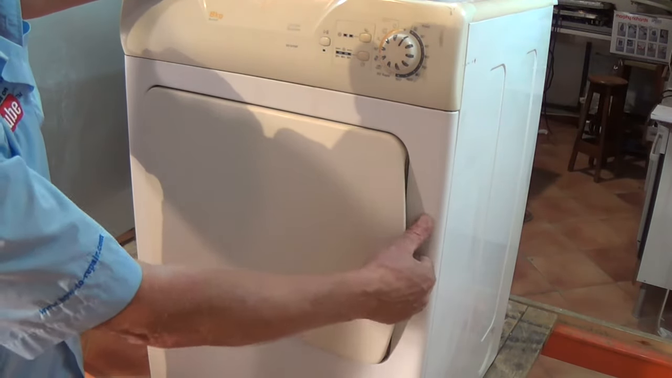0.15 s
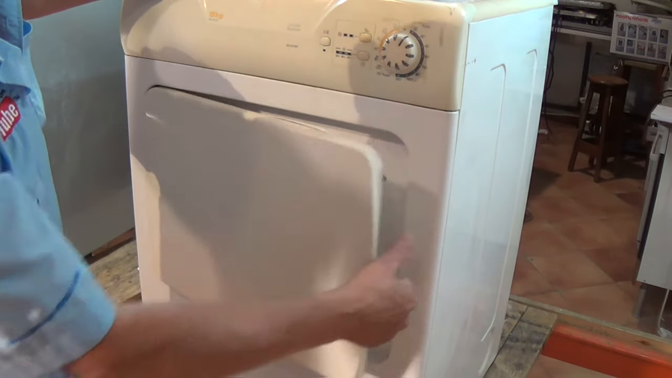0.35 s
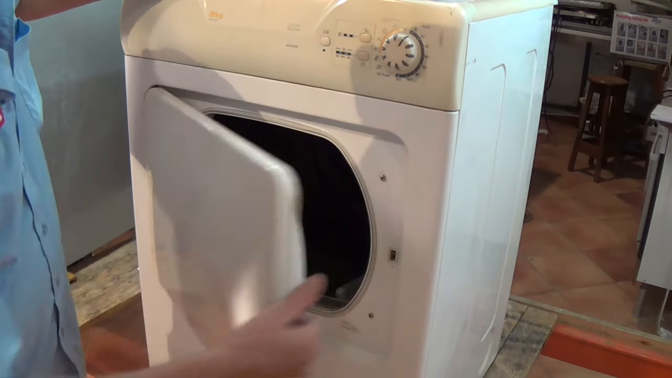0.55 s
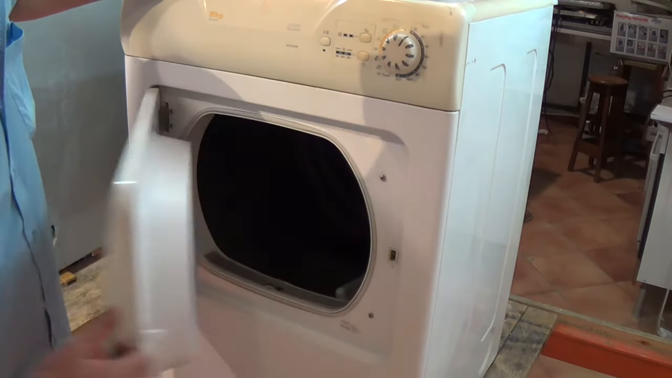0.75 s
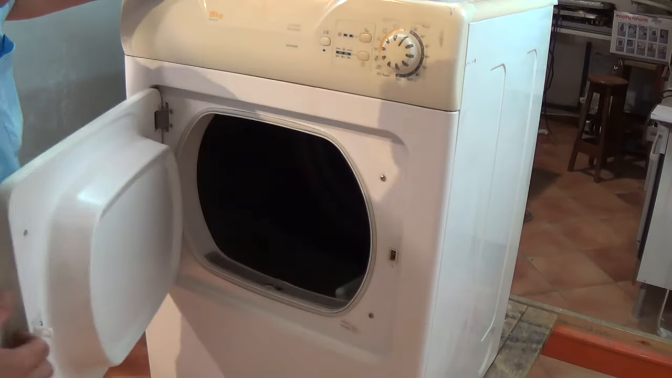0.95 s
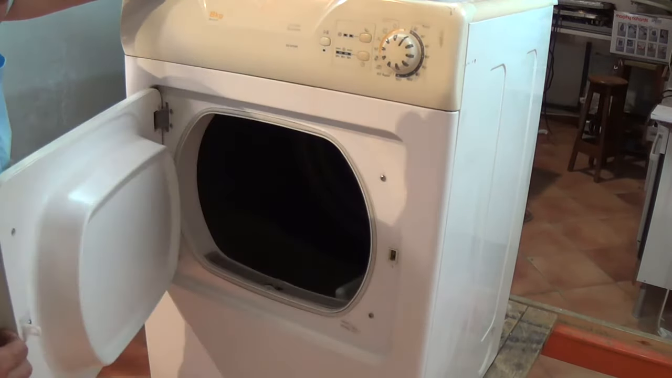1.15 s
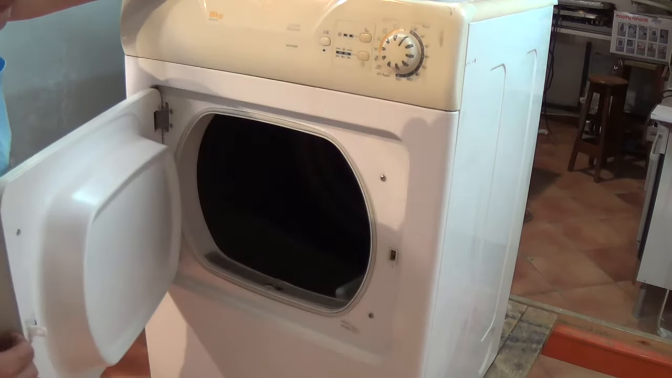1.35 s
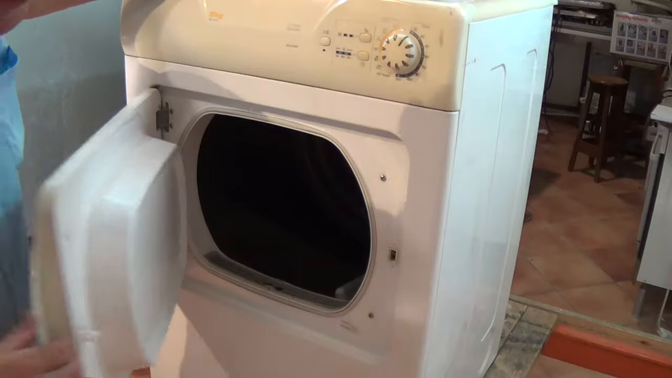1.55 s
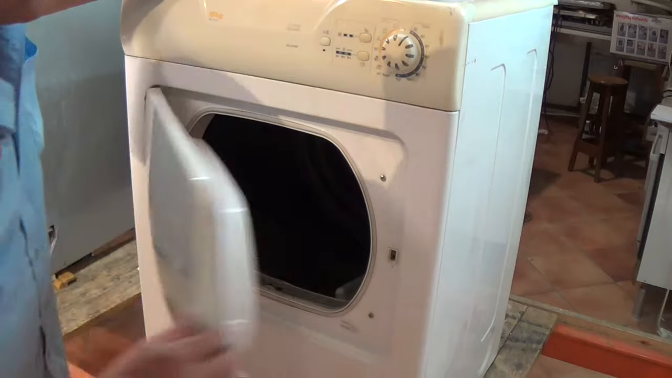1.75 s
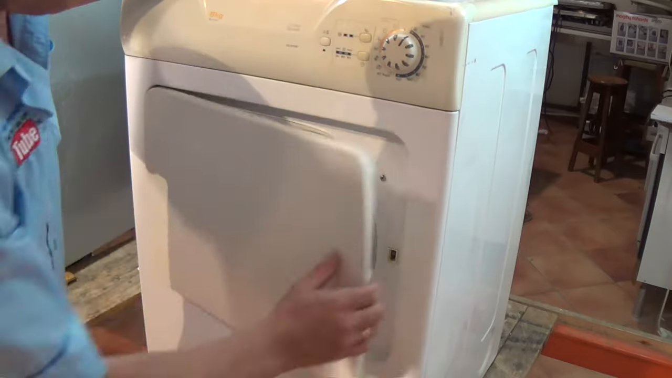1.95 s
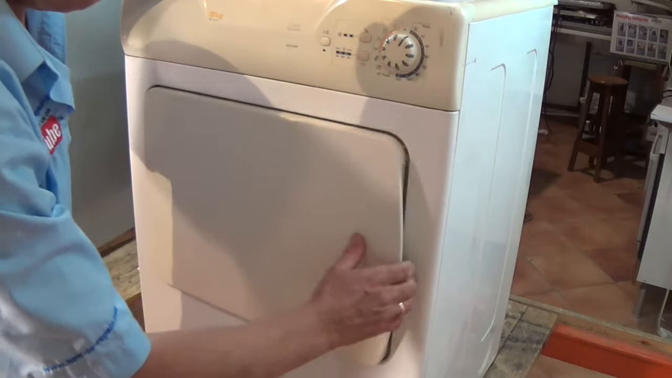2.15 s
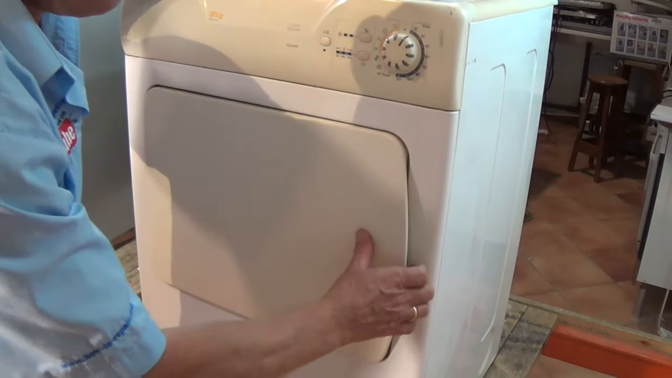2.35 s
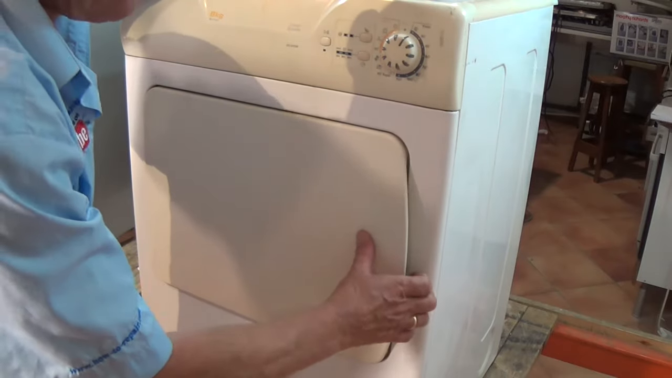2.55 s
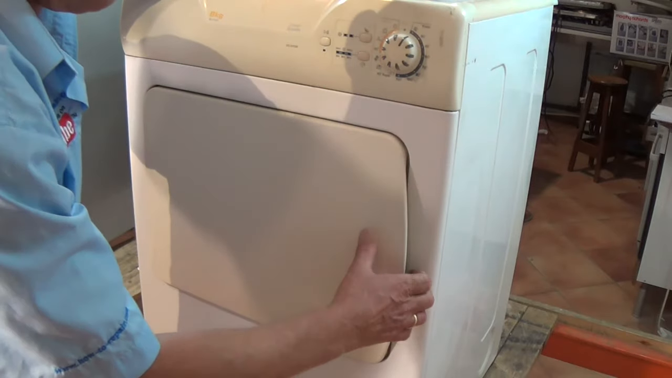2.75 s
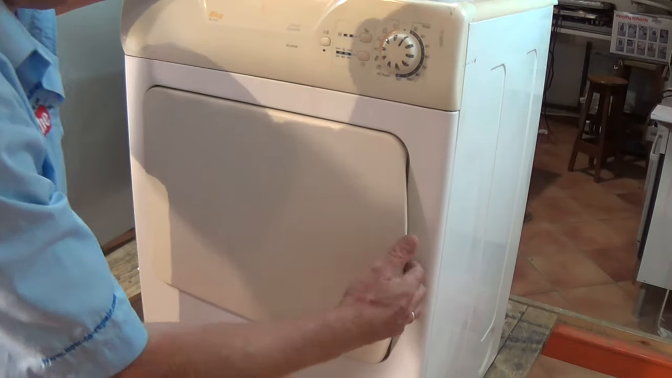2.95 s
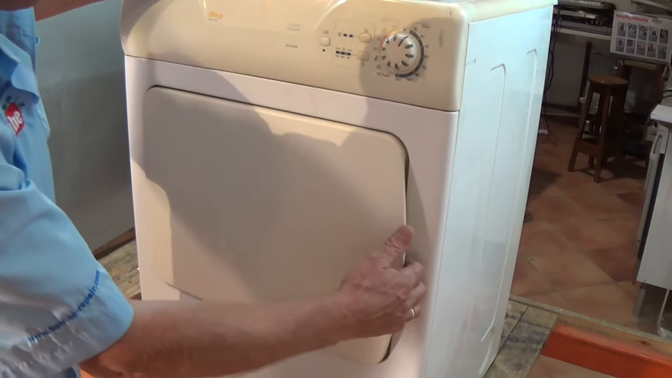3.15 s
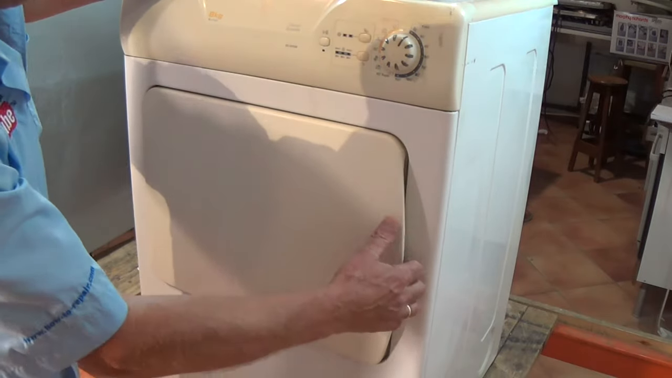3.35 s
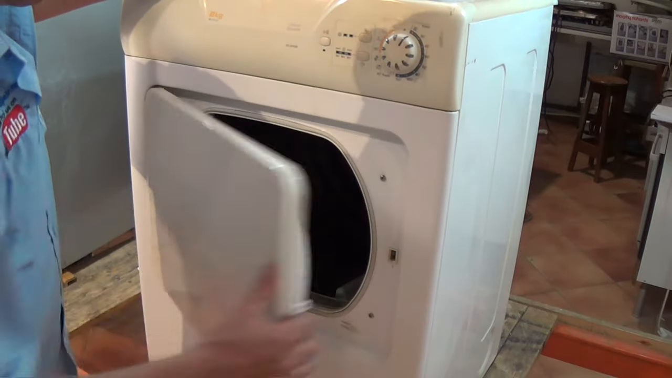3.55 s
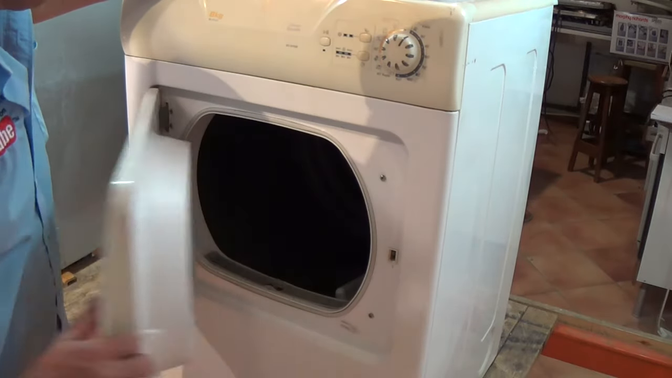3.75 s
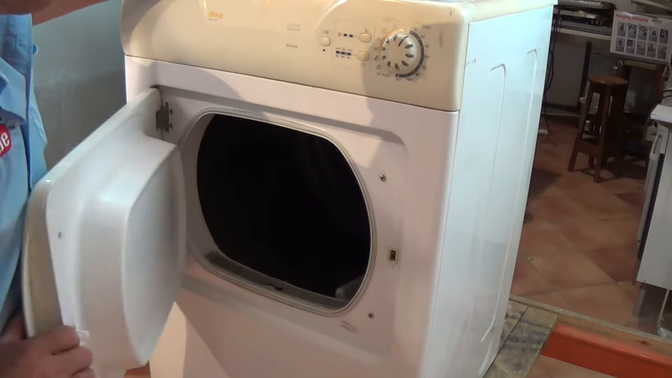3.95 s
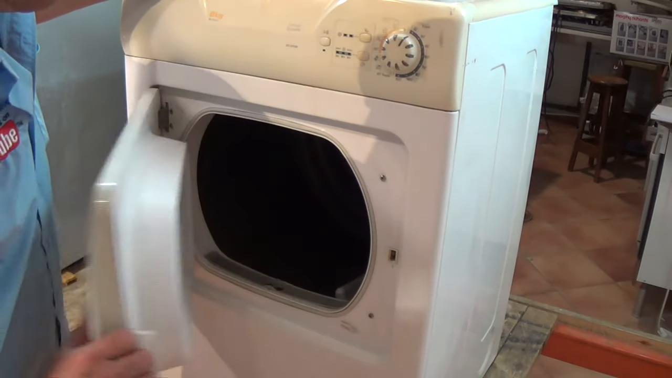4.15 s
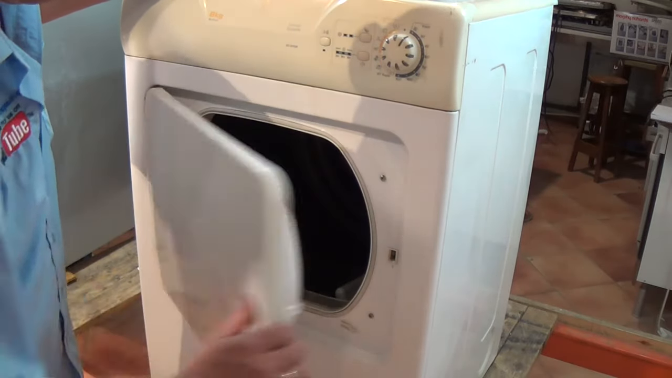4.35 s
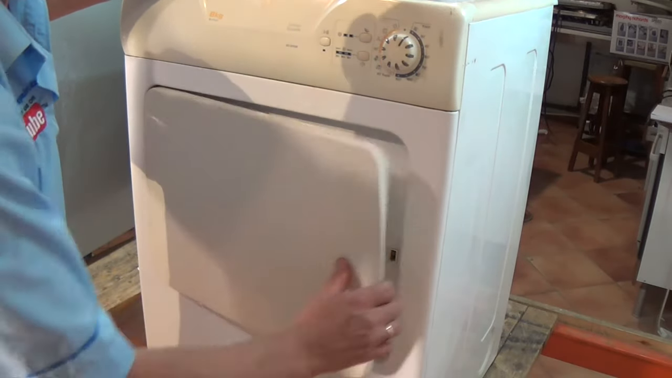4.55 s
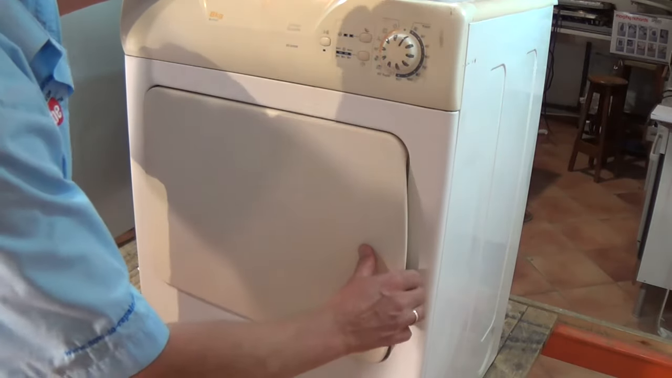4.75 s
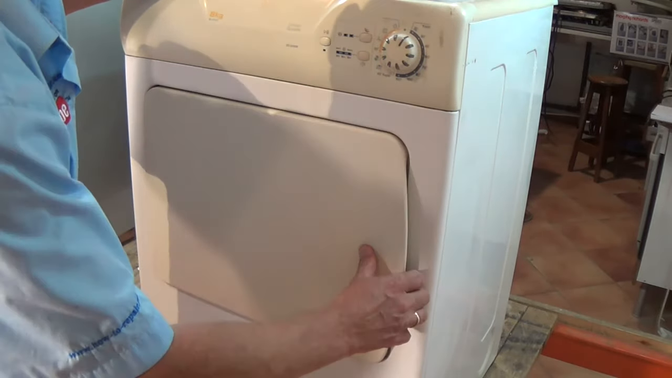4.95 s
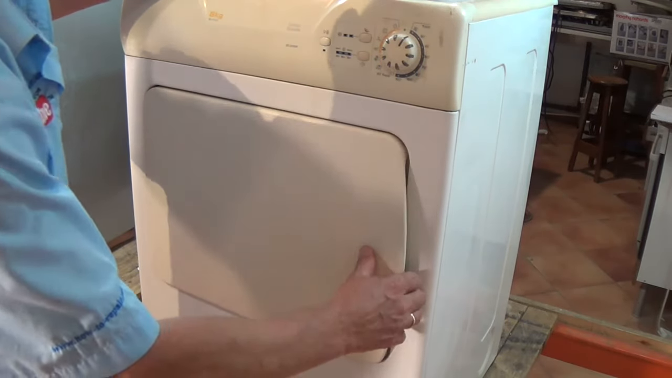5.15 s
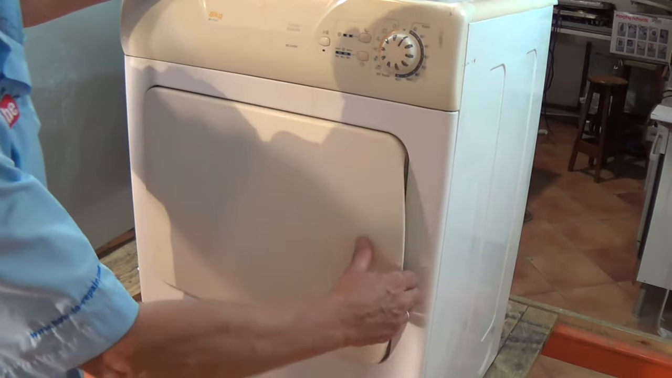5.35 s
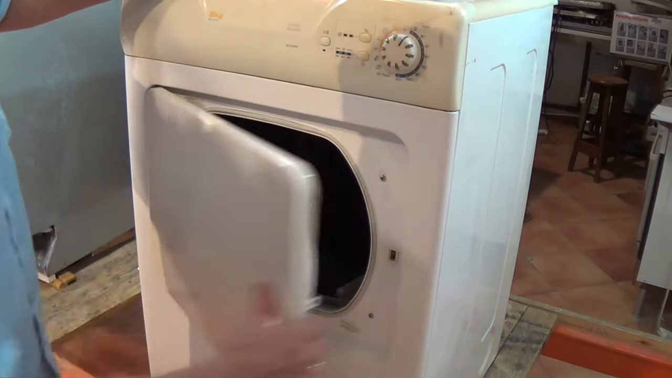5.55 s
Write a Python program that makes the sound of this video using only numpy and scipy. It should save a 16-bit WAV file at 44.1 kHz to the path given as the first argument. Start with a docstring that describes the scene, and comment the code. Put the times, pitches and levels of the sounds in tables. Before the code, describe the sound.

Loud latch snaps and hollow sheet-metal booms as a dryer door opens, creaks wide, shuts, reopens, shuts, and pops open once more.

```python
"""A tumble dryer's plastic door is pulled open, swung wide and pushed shut, twice over, then pulled open once more.
At each pull or shut, the latch's noise burst snaps and the decaying modes of the sheet-steel cabinet ring on.
Wide open, the hinge groans: uneven stick-slip pulses drive the door's resonances; after each shut it rebounds.
Throughout, banded noise makes a sleeve rustle and still air; sine waves make a faint hum and a far cricket."""
import sys
import numpy as np
from scipy import signal
from scipy.fft import rfft, irfft, next_fast_len
from scipy.io import wavfile
from scipy.ndimage import map_coordinates

SR = 44100
rng = np.random.default_rng(int(sys.argv[2]) if len(sys.argv) > 2 else 0)


def int16_out(signal):
    """Quantize to a 16-bit WAV file."""
    q = np.round(np.clip(np.atleast_2d(signal).T, -1, 1) * 32767)
    wavfile.write(sys.argv[1], SR, q.astype(np.int16))


N = 247401  # samples in the scene

# The latch snaps home. Each row: time in seconds, snap level in dB, cabinet level in dB.
LATCH_SHUTS = [(2.4700, -19, -14.5), (4.8690, -15.5, -16.5)]
# The latch lets go under a pull. Each row: time in seconds, snap level in dB, cabinet level in dB.
LATCH_PULLS = [(0.3636, -18, -20), (3.5257, -15.5, -20), (5.5295, -18.5, -19.5)]
# The hook meets and rides over its catch. Each row: time in seconds, snap level in dB, cabinet level in dB.
HOOK_TOUCHES = [(0.2875, -45.5, -48), (2.300, -39, -43.5), (2.310, -40.5, -41.5), (2.4602, -30.5, -29.5),
                (2.815, -51, -51), (3.509, -45, -38), (4.8078, -36.5, -36.5), (4.8452, -27.5, -35.5),
                (5.2604, -32.5, -40.5), (5.5115, -36, -35)]
# Sharp clicks of hinge and plastic trim. Each row: time in seconds, level in dB.
TRIM_CLICKS = [(0.178, -50), (0.2038, -44.5), (0.3257, -40.5), (0.339, -43), (0.3505, -41), (1.237, -46.5),
               (1.8163, -54), (1.932, -50.5), (3.877, -46), (4.0395, -47.5), (5.140, -48.5)]
# Knocks of hand, hook and hinge. Each row: time in seconds, door level in dB, hook ring level in dB.
DOOR_KNOCKS = [(0.043, -48, -53), (0.695, -49, -64), (0.811, -35, -56), (0.850, -36, -65),
               (0.879, -27.5, -42.5), (1.600, -48, -47), (1.695, -48, -53), (3.1423, -33, -40),
               (3.822, -30, -65), (4.160, -43, -60), (4.8073, -44, -36.5), (4.8452, -34, -46)]
# The hinge binds as the door swings wide. Each row: start in seconds, attack in seconds, hold in seconds,
# slip level in dB, panel tone level in dB.
HINGE_GROANS = [(0.80, 0.095, 0.035, -17.5, -17.5), (1.027, 0.052, 0.049, -45, -30),
                (3.809, 0.03, 0.0088, -31.5, -30), (3.851, 0.033, 0.055, -28, -28.5)]
# The hinge hits its stop. Each row: time in seconds, level in dB.
HINGE_STOPS = [(1.0588, -25)]
# Strokes of the arm. Each row: time of greatest speed in seconds, half length in seconds, rustle level in dB.
ARM_STROKES = [(0.25, 0.38, -58), (1.576, 0.047, -46.5), (1.712, 0.037, -50.5), (1.839, 0.04, -46.5),
               (3.78, 0.2, -52), (4.347, 0.095, -50), (5.424, 0.08, -54)]
# Thin, very high ticks. Each entry: time in seconds.
TICK_TIMES = [0.680, 0.998, 1.3289, 1.670, 2.787, 2.826, 3.0335, 3.049, 3.845, 4.990, 5.3996]

# Ringing steel panels. Each row: frequency in Hz, mean level in dB, 60 dB decay time in seconds.
PANEL_MODES = [(166.4, -20, 0.62), (241.6, -0.5, 0.51), (279.8, -2.5, 0.54), (361.7, -6.5, 0.68),
               (431, -5, 0.27), (486, -8, 0.27), (556, -7.5, 0.17), (590, -11, 0.35), (660, -15, 0.32),
               (694, -4, 0.42), (720, -30, 0.56), (862, -3, 0.36), (918, -10, 0.55), (990, -5, 0.33),
               (1073, -8, 0.22), (1210, -20, 0.36), (1280, -16, 0.21), (1320, -6.5, 0.29),
               (1523, -14, 0.48), (1540, -9, 0.48), (1606, -5, 0.12), (1683, -12.5, 0.25),
               (1810, -7.5, 0.3), (2050, -18, 0.38), (2103, -23, 0.56), (2500, -21.5, 0.53),
               (2530, -26, 0.27)]
# The plastic door's resonances. Each row: frequency in Hz, bandwidth in Hz, level in dB.
DOOR_MODES = [(188, 16, -12), (273, 19, 2), (376, 43, 0.5), (502, 88, -5), (560.5, 14.6, 1.5),
              (653, 17, -2.5), (742, 24, -1), (870, 55, -5.5), (937, 37, -7.5), (1026.6, 16, -7),
              (1152, 49, -35), (1234, 24, -16), (1550, 63, -18)]
# The latch hook's resonances. Each row: frequency in Hz, bandwidth in Hz, level in dB.
HOOK_MODES = [(1190, 100, -1), (1640, 89, -1.5), (2100, 280, -6), (2504, 85, 0.5), (3800, 900, -19)]
# Motor hum and a thin electronic whine. Each row: frequency in Hz, relative level in dB.
HUM_TONES = [(96.9, -61), (145.5, -64.5), (193.8, -63), (242.2, -58), (15622, -70)]

# Spectra of cabinet when shut, cabinet when pulled, latch snap, trim click, hinge stop, machine shudder,
# hinge rasp, cloth and still air. Each row: frequency in Hz, relative spectral level in dB.
SHUT_SPECTRUM = [(65, -33), (110, -9.5), (238, 1), (376, -4), (435, -4), (688, -3.5), (1020, -6.5),
                 (1110, -6), (2210, -16), (4130, -23), (5530, -29), (10500, -33), (13800, -39),
                 (15000, -68), (16000, -91)]
PULL_SPECTRUM = [(65, -33), (110, -15), (174, -17), (248, 0.5), (332, -3.5), (426, -4), (525, -9.5),
                 (1210, -6.5), (1720, -16), (1870, -13.5), (4780, -23), (6950, -31), (10500, -27),
                 (14700, -38.5), (16000, -48)]
SNAP_SPECTRUM = [(300, -7), (900, 8), (2400, 4), (4000, -3), (6500, -16), (9000, -2), (11300, -3.5),
                 (13000, -14.5), (16000, -30)]
CLICK_SPECTRUM = [(300, -30), (1000, -4), (1800, 9), (2400, 3), (3600, -5), (4600, -4), (7000, -9),
                  (9000, 1.5), (11500, -3.5), (13500, -8), (16000, -27)]
STOP_SPECTRUM = [(500, -30), (1000, -4), (1650, -6), (2300, 0), (3700, -1.5), (5600, -9), (7000, -7),
                 (9000, -2.5), (11500, -0.5), (13900, -9), (16000, -28)]
SHUDDER_SPECTRUM = [(20, -22), (32, -29), (42, -4.5), (62, -6), (85, -12.5), (130, -13.5), (220, -6),
                    (500, -67)]
RASP_SPECTRUM = [(200, -14.5), (420, -3), (560, -11), (780, 7.5), (1200, -9), (1700, -10), (2300, -20),
                 (3000, -20.5), (3500, -26.5), (5000, -34), (8000, -35.5), (16000, -40)]
CLOTH_SPECTRUM = [(150, -18), (420, -1.5), (900, -5), (1800, -6.5), (3000, -15), (6500, -23.5),
                  (10500, -16.5), (16000, -37)]
AIR_SPECTRUM = [(15, -39), (25, -7), (53, -8.5), (71, -10), (101, -6.5), (167, -16), (181, -8.5),
                (243, -10.5), (271, -8), (515, -14.5), (1030, -21), (1210, -22.5), (1910, -25), (4260, -28),
                (15000, -33.5)]

# Decay of the cabinet and of the room. Each row: frequency in Hz, 60 dB decay time in seconds.
CABINET_DECAY = [(50, 1.3), (200, 0.62), (500, 0.53), (1200, 0.46), (3000, 0.46), (8000, 0.46),
                 (14000, 0.4)]
ROOM_DECAY = [(150, 0.85), (1000, 0.34), (5000, 0.53), (14000, 0.33)]
# Stereo width of the sources and of still air. Each row: frequency in Hz, side over mid in dB.
SOURCE_WIDTH = [(40, -16), (150, -15.5), (400, -10.5), (1500, -9), (4500, -9), (8000, -14.5), (14000, -51)]
AIR_SPREAD = [(60, -25), (200, -18), (380, -11), (1300, -0.5), (2400, -2.5), (8000, -10.5), (15000, -24)]
# Channel balance. Each row: frequency in Hz, left over right in dB.
LEFT_EXCESS = [(50, 1.5), (200, 2), (400, 0.9), (1200, -0.5), (4000, -.6), (9000, -0.5)]
# Channel phase. Each row: frequency in Hz, lead of left over right in radians.
LEFT_LEAD = [(50, 0.082), (340, 0.66), (1200, 0.35), (3000, 0.034)]

# A shut door's rebounds: first delay after the snap (s), interval (s), loss at each rebound (dB)
SEAL_DELAY_S, REBOUND_S, REBOUND_LOSS_DB = 0.041, 0.062, 11
RASP_S = 0.005  # time constant of one slip's rasp (s)
TOP_HZ = 16000  # upper band limit (Hz)
BLOW_T = np.arange(SR) / SR  # time within one blow (s)
SCENE_T = np.arange(N) / SR  # time within the scene (s)


def latch(events, colour, ripple, ring_db, shudder_db, spread_s, snap_t60,
          clatter_db, clatter_t60, rebound_db, rebound_s):
    """Impact excitation: a crack and clatter, energy spreading into panel modes, and a shudder in proportion."""
    out = np.zeros((2, N))
    for s, snap_db, cabinet_db in events:
        decay = dying(snap_t60) + amp(clatter_db) * dying(clatter_t60)
        snap = unit(filtered(noise(SNAP_SPECTRUM, SR), ripple) * decay, size=180)
        dense_modes = unit(filtered(fading(colour, CABINET_DECAY), ripple), size=2600)
        body = dense_modes + amp(ring_db) * panels(scatter_db=2, spread=0.29)
        # 1 - dying() delays the full response while the energy spreads
        shudder = unit(fading(SHUDDER_SPECTRUM, CABINET_DECAY), size=6000) * (1 - dying(0.025))
        cabinet = body * (1 - dying(spread_s)) + amp(shudder_db) * shudder
        add(out, s, amp(snap_db) * snap + amp(cabinet_db) * cabinet)
        # the sprung hook bounces once and rings
        hook = unit(resonate(rng.standard_normal(SR) * dying(0.051), HOOK_MODES), size=260)
        add(out, s + rebound_s, amp(snap_db + rebound_db) * hook)
    return out


def panels(scatter_db, spread):
    """Modal superposition: decaying sines whose strengths and phases are drawn afresh for every blow."""
    hz, db, t60 = np.transpose(PANEL_MODES)[:, :, None]
    strength = amp(db + scatter_db * rng.standard_normal(hz.shape))
    shared_phase = rng.uniform(0, 2 * np.pi, hz.shape)
    phase = shared_phase + spread * rng.standard_normal((2, *hz.shape))
    modes = strength * dying(t60) * np.sin(2 * np.pi * hz * BLOW_T + phase)
    return unit(np.sum(modes, axis=1), size=2600)


def clusters(depth_db, step_hz):
    """Modal density: modes crowd and thin out by band, giving one random ripple shared by all blows."""
    knots = rng.standard_normal(512)
    return lambda hz: amp(depth_db * map_coordinates(knots, [hz / step_hz], mode="wrap"))


def spring_back(db, hz, lead_s, length_s, scrape_db, scrape_s):
    """Elastic release: friction scrapes ever harder, then the bent door springs straight in one low push."""
    out = np.zeros((2, N))
    for s, *_ in LATCH_PULLS:
        t = SCENE_T - s
        scrape = noise(PULL_SPECTRUM, N) * np.exp(-np.abs(t) / scrape_s) * (t < 0)
        push_t = t + lead_s
        push = np.cos(2 * np.pi * hz * push_t) * np.exp(-(push_t / length_s) ** 2)
        out += amp(scrape_db) * scrape
        out += amp(db) * push
    return out


def bumps(db, t60, rise_s):
    """Inelastic rebound: each return is weaker, and the soft seal stirs only the lowest panel modes."""
    out = np.zeros((2, N))
    for s, snap_db, _ in LATCH_SHUTS:
        for k in range(3):
            ring = sum(amp(level) * np.sin(2 * np.pi * hz * BLOW_T + rng.normal(0, 0.73))
                       for hz, level, _ in PANEL_MODES[:4])
            bump = unit(ring * dying(t60) * (1 - dying(rise_s)), size=1100)
            level_db = snap_db + db - k * REBOUND_LOSS_DB
            add(out, s + SEAL_DELAY_S + k * REBOUND_S, amp(level_db) * bump)
    return out


def groan(slip_hz, uneven, slip_db, grit_db, harden, tone_db, under_db, sway_db, waver):
    """Stick-slip friction: uneven slips knock the door's resonances while its low modes sing."""
    def sing(hz):
        """Unsteady oscillation: a sine with wandering strength and phase."""
        strength = amp(1.5 * wobble(60))
        return strength * np.sin(2 * np.pi * hz * SCENE_T + waver * wobble(25.1))

    force, tone, sway = binding(steep=2.4, slip_t60=0.27, tone_t60=0.4, linger_db=-9,
                                linger_t60=0.88, sway_t60=0.99, sway_follows=0.53)
    # one slip falls at each whole turn of a wandering clock
    turns = np.cumsum(slip_hz * np.exp(uneven * wobble(90))) / SR
    slips = np.diff(np.floor(turns), prepend=0) * amp(1.3 * wobble(120))
    knocking = resonate(force * slips, DOOR_MODES) / np.std(resonate(slips, DOOR_MODES))
    # every slip ends in a short rasp, which grows faster than the force
    rasps = rng.standard_normal(N) * np.exp(-(turns % 1) / (slip_hz * RASP_S))
    rasp_colour = unit(filtered(rasps, lambda hz: amp(along(RASP_SPECTRUM, hz))))
    grit = rasp_colour * force * (force / 0.14) ** harden
    creak = room(amp(slip_db) * knocking + amp(grit_db) * grit, wet_db=-6)
    panel_tone = tone * (sing(hz=366.3) + amp(under_db) * sing(hz=286.4))
    return creak + amp(tone_db) * panel_tone + amp(sway_db) * sway * sing(hz=189)


def binding(steep, slip_t60, tone_t60, linger_db, linger_t60, sway_t60, sway_follows):
    """Friction loading: slip force, tone and sway build together; slips die first and sway last."""
    force, tone, sway = np.zeros((3, N))
    for start, attack, hold, slip_db, tone_db in HINGE_GROANS:
        def shape(t60):
            """Common loading: the same build-up with a chosen decay."""
            return swell(start, attack, hold, t60, steep)

        force = np.maximum(force, amp(slip_db) * shape(slip_t60))
        two_stage_decay = np.maximum(shape(tone_t60), amp(linger_db) * shape(linger_t60))
        tone = np.maximum(tone, amp(tone_db) * two_stage_decay)
        sway = np.maximum(sway, amp(sway_follows * slip_db) * shape(sway_t60))
    return force, tone, sway


def swell(start, attack, hold, release_t60, steep):
    """Growth and decay: a gain follows a power law up, holds, then falls exponentially."""
    t = SCENE_T - start
    rise = np.clip(t / attack, 0, 1) ** steep
    return rise * np.exp(-np.log(1000) * np.maximum(t - attack - hold, 0) / release_t60)


def knocks(contact_t60, thud_hz, thud_t60, thud_db, hook_t60):
    """Short contact forces: light blows ring door and hook over the damped thud of a hollow shell."""
    out = np.zeros((2, N))
    for s, db, hook_db in DOOR_KNOCKS:
        ring = unit(resonate(dying(contact_t60), DOOR_MODES), size=900)
        thud = unit(np.sin(2 * np.pi * thud_hz * BLOW_T) * dying(thud_t60), size=900)
        door = unit(ring + amp(thud_db) * thud, size=900)
        hook = unit(resonate(dying(hook_t60), HOOK_MODES), size=440)
        add(out, s, room(amp(db) * door + amp(hook_db) * hook, wet_db=-5.0))
    return out


def clicks(events, colour, t60, wet_db):
    """Broadband impulses: small hard parts snap without moving the cabinet."""
    out = np.zeros((2, N))
    for s, db in events:
        click = unit(noise(colour, SR) * dying(t60), size=220)
        add(out, s, room(amp(db) * click, wet_db))
    return out


def sleeve(rest_db, grain_db):
    """Friction noise: cloth rubs unevenly, its power the sum of a faint rest and each arm stroke."""
    power = amp(rest_db) ** 2
    for s, half, db in ARM_STROKES:
        power = power + amp(db) ** 2 * np.exp(-((SCENE_T - s) / half) ** 2)
    rubbing = unit(noise(CLOTH_SPECTRUM, N) * amp(grain_db * wobble(110)))
    return np.sqrt(power) * rubbing


def ticks(db, hz, width_hz, t60):
    """Resonant filtering: short noise bursts through one high band make tiny, glassy ticks."""
    out = np.zeros((2, N))
    for s in TICK_TIMES:
        burst = rng.standard_normal(SR) * dying(t60)
        add(out, s, amp(db) * unit(resonate(burst, [(hz, width_hz, 0)]), size=330))
    return out


def cricket(db, hz, stroke_hz, sharp):
    """Amplitude modulation: each wing stroke is a short pure note, in trains with brief rests."""
    strokes = np.abs(np.sin(np.pi * stroke_hz * SCENE_T + 0.26 * wobble(4.1))) ** sharp
    trains = np.clip(1 + wobble(7), 0, 1)
    return amp(db) * trains * strokes * np.sin(2 * np.pi * hz * SCENE_T + wobble(40))


def workshop(air_db, hum_db):
    """Steady background: shaped noise for still air, plus tones of slightly wandering level and phase."""
    hum = np.zeros(N)
    for hz, db in HUM_TONES:
        strength = amp(db + 2.1 * wobble(4.64)) * np.sqrt(2)
        hum += strength * np.sin(2 * np.pi * hz * SCENE_T + 0.66 * wobble(1.67))
    return amp(air_db) * noise(AIR_SPECTRUM, N, AIR_SPREAD) + amp(hum_db) * hum


def room(x, wet_db):
    """Diffuse reverberation: a decaying noise tail, rising over a few milliseconds, answers the sound."""
    tail = fading([(1000, 0)], ROOM_DECAY) * (1 - dying(0.048))
    tail = tail / np.linalg.norm(tail[0])
    answer = signal.fftconvolve(np.atleast_2d(x), tail, axes=1)[:, :x.shape[-1]]
    return x + amp(wet_db) * answer


def placed(x):
    """Interchannel difference: the dryer's low notes reach the left earlier and stronger."""
    halves = [0.5, -0.5]

    def response(hz):
        """Symmetric division: half of each difference goes to either channel."""
        return amp(np.outer(halves, along(LEFT_EXCESS, hz))) * np.exp(1j * np.outer(halves, along(LEFT_LEAD, hz)))

    return filtered(x, response)


def resonate(x, modes):
    """Modal response: a force drives parallel second-order resonances of alternating sign."""
    def response(f):
        """Linear superposition: the resonances' complex responses add."""
        total = 0
        for k, (centre, width, db) in enumerate(modes):
            bandpass = 1j * f * width / (centre * centre - f * f + 1j * f * width)
            total = total + (-1) ** k * amp(db) * bandpass
        return total

    return filtered(x, response)


def fading(colour, t60):
    """Frequency-dependent damping: a crowd of overlapping modes dies at its own speed in each band."""
    hz, t, bands = signal.stft(noise(colour, SR), SR, nperseg=256)
    decay = amp(-60 * t / along(t60, hz)[:, None])
    return signal.istft(bands * decay, SR, nperseg=256)[1][:, :SR]


def dying(t60):
    """Exponential damping: a fall of 60 dB in t60 seconds."""
    return np.exp(-np.log(1000) * BLOW_T / t60)


def noise(colour, size, width=SOURCE_WIDTH):
    """Partial coherence: shaped mid and side noises combine into stereo of rms 1."""
    def response(hz):
        """Spectral shaping: a common colour, with the side scaled by the width."""
        return amp(along(colour, hz)) * np.array([np.ones_like(hz), amp(along(width, hz))])

    mid, side = filtered(rng.standard_normal((2, size)), response)
    return unit(np.array([mid + side, mid - side]))


def filtered(x, response):
    """Linear filtering: multiply the spectrum by a response of frequency."""
    n = x.shape[-1]
    m = next_fast_len(n + SR // 2)  # padding limits wrap-around
    return irfft(rfft(x, m) * response(np.fft.rfftfreq(m, 1 / SR)), m)[..., :n]


def wobble(rate):
    """Slow fluctuation: a smooth random curve through rate knots a second."""
    knots = rng.standard_normal(int(N * rate / SR) + 4)
    return map_coordinates(knots, [np.arange(N) * rate / SR])


def along(points, hz):
    """Logarithmic frequency scale: interpolate (Hz, value) points."""
    f, v = np.transpose(points)
    return np.interp(np.log(hz + 1), np.log(f + 1), v)


def amp(db):
    """Level definition: decibels to amplitude gain."""
    return 10 ** (np.asarray(db) / 20)


def unit(x, size=None):
    """Power normalisation: scale to rms 1 over the first size samples."""
    return x / np.sqrt(np.mean(x[..., :size] ** 2) + 1e-20)


def add(track, s, sound):
    """Superposition: mix a sound into the track from time s in seconds."""
    part = track[:, round(s * SR):][:, :sound.shape[-1]]
    part += sound[..., :part.shape[-1]]


def scene():
    """Superposition of sources: latch, door, arm and room sound together."""
    ripple = clusters(depth_db=2, step_hz=75)
    shuts = latch(LATCH_SHUTS, SHUT_SPECTRUM, ripple, ring_db=-3.5, shudder_db=-15.5, spread_s=0.048,
                  snap_t60=0.019, clatter_db=-11, clatter_t60=0.24, rebound_db=-5.0, rebound_s=0.00202)
    pulls = latch(LATCH_PULLS, PULL_SPECTRUM, ripple, ring_db=-3.5, shudder_db=-9.5, spread_s=0.014,
                  snap_t60=0.017, clatter_db=-14.0, clatter_t60=0.17, rebound_db=-7, rebound_s=0.006)
    touches = latch(HOOK_TOUCHES, SHUT_SPECTRUM, ripple, ring_db=-1.0, shudder_db=-1.5, spread_s=0.003,
                    snap_t60=0.026, clatter_db=-24, clatter_t60=0.17, rebound_db=-8, rebound_s=0.00209)
    flex = spring_back(db=-11.0, hz=258, lead_s=0.0032, length_s=0.0041, scrape_db=-24.5, scrape_s=0.0098)
    flex += bumps(db=-8.5, t60=0.16, rise_s=0.026)
    hinge = groan(slip_hz=85.3, uneven=0.3, slip_db=-4.5, grit_db=-5.5, harden=0.63,
                  tone_db=2, under_db=-10.5, sway_db=-25, waver=0.68)
    hinge = hinge + clicks(HINGE_STOPS, STOP_SPECTRUM, t60=0.087, wet_db=-6.0)
    taps = knocks(contact_t60=0.0005, thud_hz=432, thud_t60=0.088, thud_db=-1, hook_t60=0.00021)
    taps += clicks(TRIM_CLICKS, CLICK_SPECTRUM, t60=0.026, wet_db=-3.5)
    dryer = placed(shuts + pulls + touches + flex + hinge + taps)
    around = workshop(air_db=-51.0, hum_db=0.5)
    around += ticks(db=-53.5, hz=11500, width_hz=2000, t60=0.063)
    around += cricket(db=-60.5, hz=4190, stroke_hz=24.6, sharp=4.7)
    return dryer + sleeve(rest_db=-61, grain_db=2) + around


def record(dry):
    """Saturation and band limiting: round off the highest peaks, then keep only frequencies below TOP_HZ."""
    rounded = dry / (1 + (dry / 0.75) ** 4) ** 0.25
    return filtered(rounded, lambda hz: hz < TOP_HZ)


dry = scene()
out = record(dry)
int16_out(out)
```